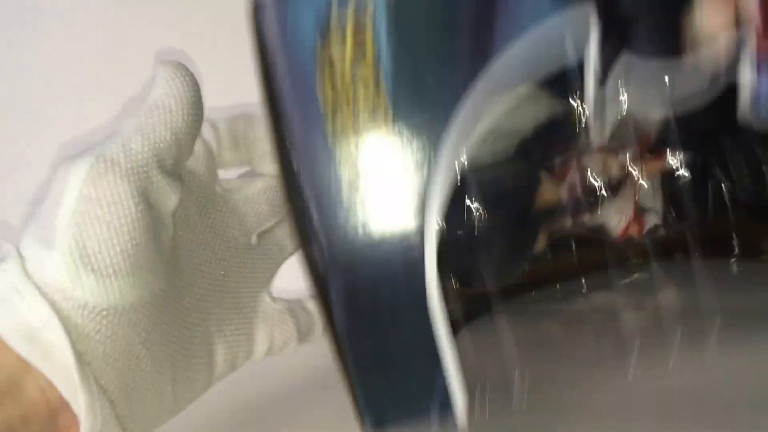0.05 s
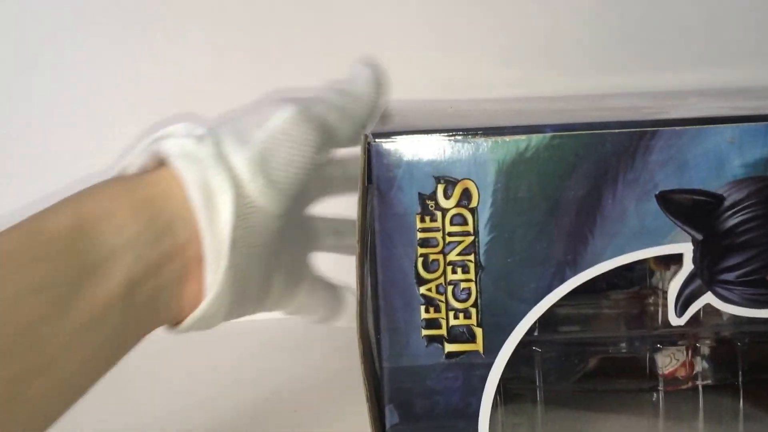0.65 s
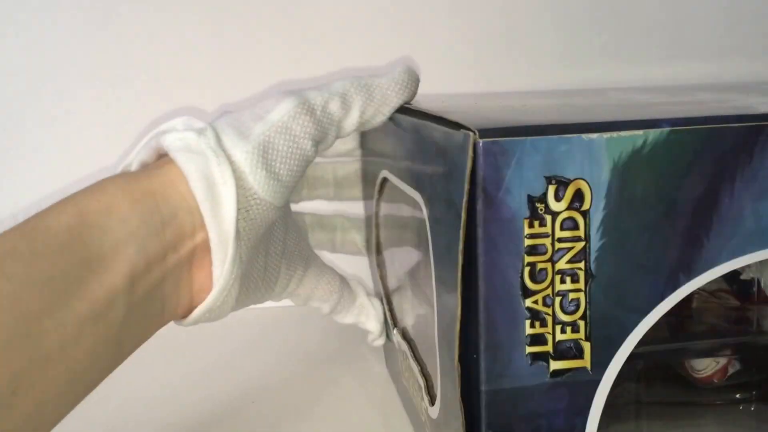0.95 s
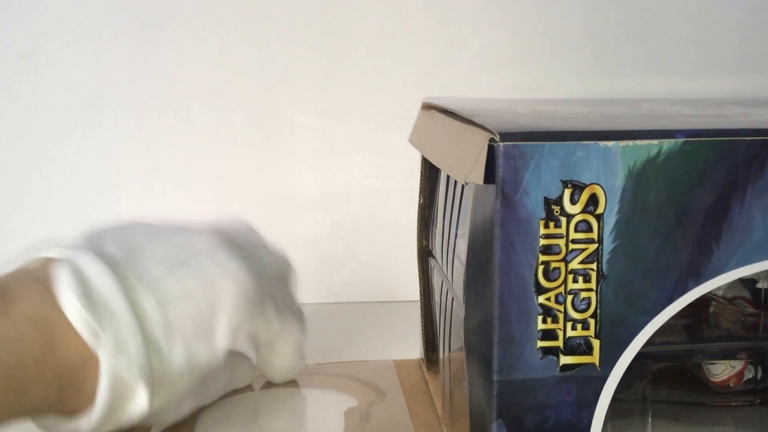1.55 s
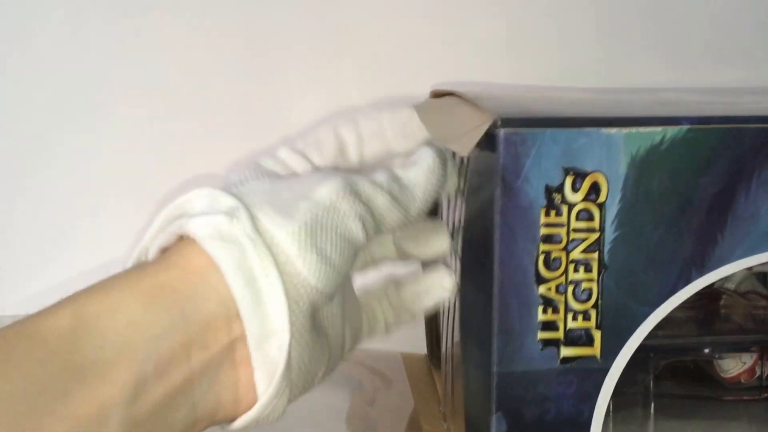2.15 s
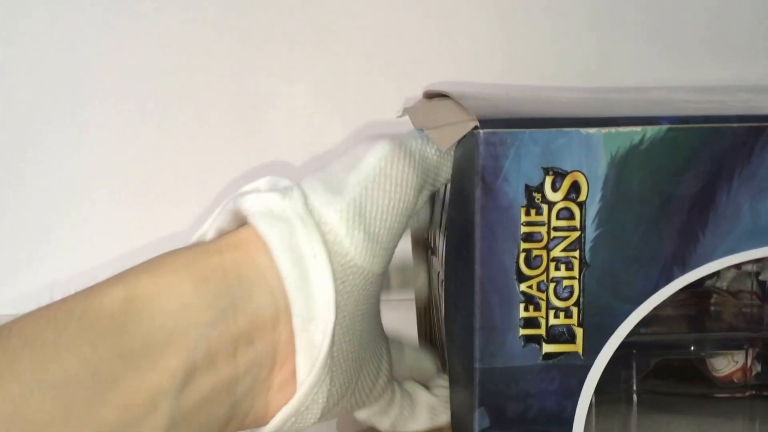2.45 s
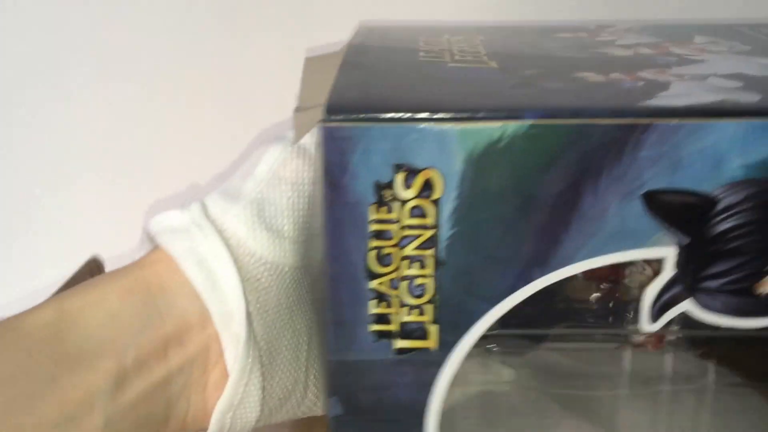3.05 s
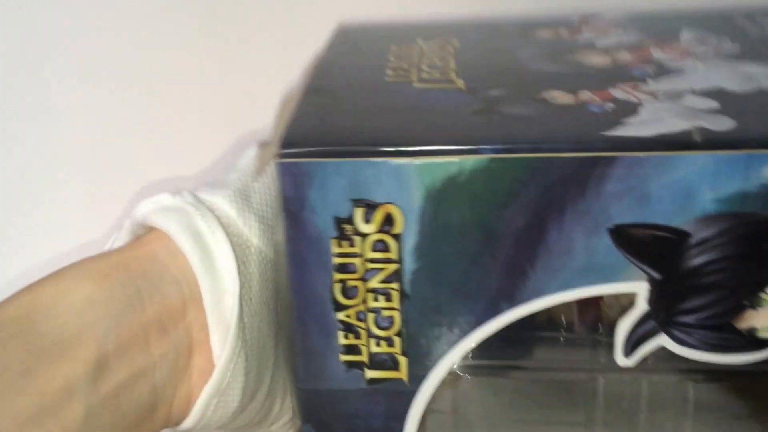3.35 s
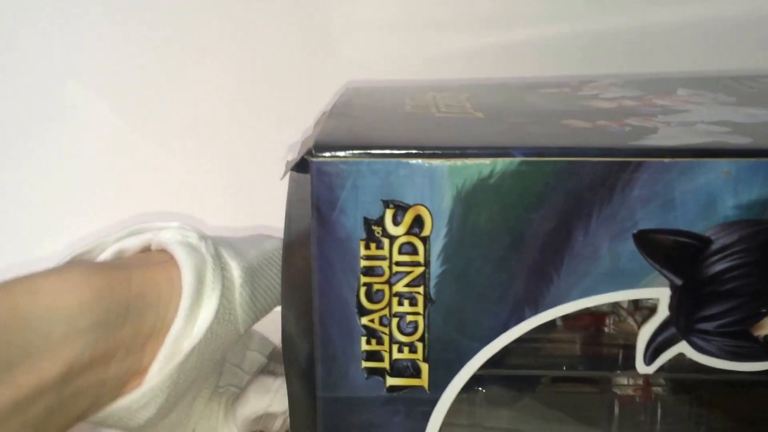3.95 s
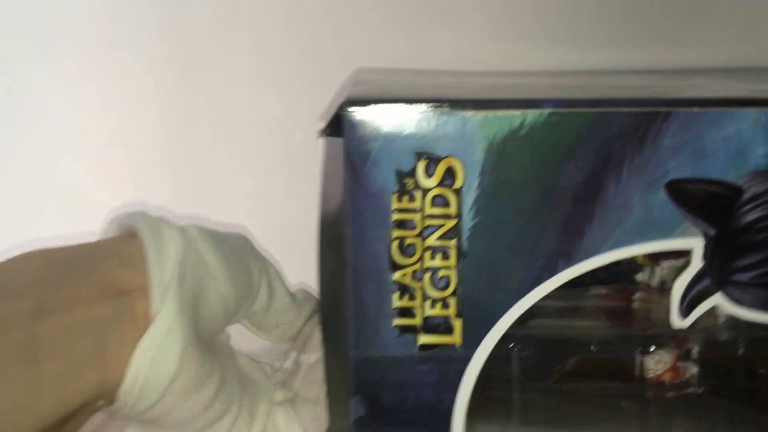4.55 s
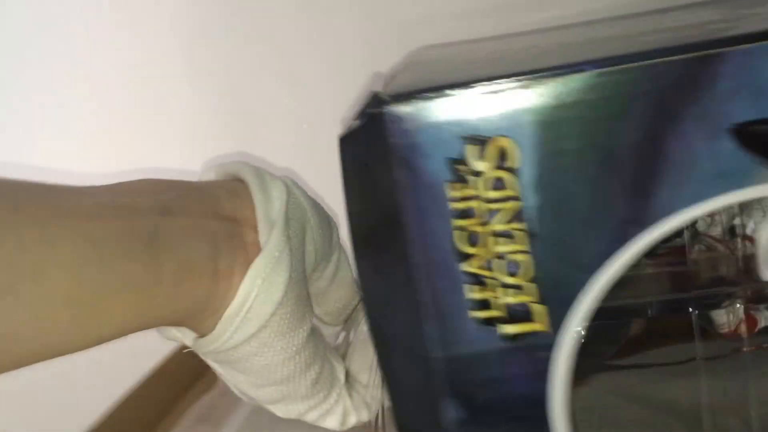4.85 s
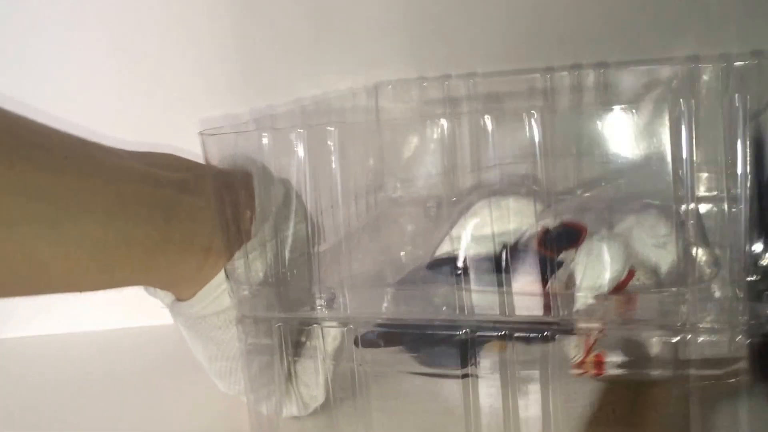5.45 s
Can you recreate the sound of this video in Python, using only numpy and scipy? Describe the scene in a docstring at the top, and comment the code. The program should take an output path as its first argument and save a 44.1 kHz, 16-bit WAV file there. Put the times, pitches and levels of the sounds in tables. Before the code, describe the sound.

Gloved hands knock and open a cardboard box and tug out a stiff plastic tray, which crackles and scrapes hollowly, close up.

```python
"""A knitted glove hisses and zips over a glossy cardboard box, which knocks down on a table.
The flap is opened, then from 2.8 s a plastic tray is tugged and dragged out along the card.
Rubbing is a stream of tiny slips that shake box and tray. The stiff plastic buckles in sharp snaps
and small ticks, the walls drum, and the emptying box sounds hollow. Close up, in a small quiet room."""
import sys
import numpy as np
from scipy import signal
from scipy.fft import rfft, irfft, next_fast_len
from scipy.io import wavfile
from scipy.ndimage import uniform_filter1d

SR = 44100
rng = np.random.default_rng(int(sys.argv[2]) if len(sys.argv) > 2 else 0)


def persist_wave(psi):
    """Save psi, clipped to +-1, as 16-bit WAV."""
    counts = np.round(np.clip(psi, -1, 1) * 32767).astype(np.int16)
    wavfile.write(sys.argv[1], SR, np.atleast_2d(counts).T)


N = 242991
TIME = np.arange(N) / SR
AGE = TIME[:SR // 3]   # seconds since a blow
CUTOFF_HZ = 15450
GRIP_S = 2.8   # the hand passes from box to tray

# glove strokes: peak/s, rise/s, fall/s, scrape/dB, hiss/dB re scrape, sizzle/dB re hiss
GLOVE_STROKES = [(.04, 0.18, 0.13, -50, 6, -2.5), (.21, 0.077, 0.054, -52, 0, 2),
                 (.3, .1, 0.33, -53, -7, -17), (.78, .015, .05, -50.5, -6, -17),
                 (.91, 0.14, 0.1, -51.5, -1.5, -9), (1.135, 0.13, 0.084, -46, 4, -2),
                 (1.22, 0.028, .03, -45, 6, -15), (1.27, 0.095, 0.1, -52.5, 2, -2),
                 (1.76, 0.068, 0.062, -51.5, 4.5, 2.5), (1.83, 0.026, 0.1, -49.5, -2.5, 2),
                 (1.93, 0.055, 0.056, -47.5, 0, 5), (2.07, 0.13, .08, -56, -1.5, -13),
                 (2.45, 0.048, 0.064, -58, 7, 2), (2.5, 0.024, 0.052, -45.5, -10, -1),
                 (2.585, 0.067, 0.033, -39.5, 0.5, -23), (2.69, 0.09, 0.12, -50.5, 6.5, -4.5),
                 (2.745, 0.042, 0.019, -40, -6.5, -9), (3.385, 0.043, 0.073, -49, 0, -2.5)]
# tugs on the tray: peak/s, rise/s, fall/s, scrape/dB, hiss/dB re scrape, hollow voice/dB re scrape
TRAY_STROKES = [(2.82, 0.043, 0.12, -46.5, -9, -16), (3.02, 0.079, 0.044, -41, -5, -12),
                (3.23, .03, 0.035, -41.5, -4.5, -14), (3.39, 0.11, 0.15, -46, -8.5, -16),
                (3.73, 0.042, 0.23, -47.5, -34, 0), (4.14, 0.14, 0.07, -43, -11, -5),
                (4.3, 0.13, .1, -47.5, -11, -1), (4.58, 0.21, 0.19, -52.5, -5, 3),
                (4.785, 0.028, 0.049, -42.5, -3, 4.5), (4.85, 0.13, 0.08, -44, -22, 6),
                (4.945, 0.028, 0.089, -45, -10, -2), (5.015, 0.09, 0.091, -34, 0.5, 2.5),
                (5.14, 0.28, .22, -43, -0.5, 6), (5.335, .13, 0.12, -31, -4, 1),
                (5.495, 0.16, .2, -32.5, 0, 3.5)]
# tone of cracking plastic: f/Hz, level/dB
CRACK_EQ = [(2800, 4.5), (4500, 3), (7000, 0.5), (10000, -3.5), (15500, 1)]


def from_db(db):
    """Decibels to gain."""
    return 10 ** (np.asarray(db) / 20)


def rms_one(x):
    """Scale to unit power."""
    return x / np.sqrt(np.mean(x ** 2) + 1e-20)


def add(out, s, sound):
    """Mix a sound in at time s."""
    at = max(round(s * SR), 0)
    out[at:at + len(sound)] += sound[:N - at]


def drift(rate_hz):
    """Smooth random wandering with spread 1."""
    r = np.exp(-40 * np.pi * rate_hz / SR)
    slow = signal.lfilter([1], [1, -2 * r, r * r], rng.standard_normal(N // 20 + 2002))[2000:]
    return np.interp(np.arange(N) / 20, np.arange(len(slow)), rms_one(slow))


def band(x, low_hz, high_hz):
    """Causal band-pass."""
    return signal.sosfilt(signal.butter(2, [low_hz, high_hz], "band", fs=SR, output="sos"), x)


def resonate(x, hz, width_hz):
    """One resonance with gain 1 at its top."""
    r = np.exp(-np.pi * width_hz / SR)
    poles = [1, -2 * r * np.cos(2 * np.pi * hz / SR), r * r]
    return signal.lfilter(np.array([1, 0, -1]) * (1 - r * r) / 2, poles, x + 1e-18)


def colour(x, eq):
    """Minimum-phase EQ, so nothing rings ahead of an attack."""
    size = 2 * next_fast_len(len(x) // 2 + 1024)
    hz, db = np.transpose(eq)
    bin_hz = np.arange(size // 2 + 1) * SR / size
    cepstrum = irfft(np.log(from_db(np.interp(np.log(bin_hz + 1), np.log(hz), db))))
    cepstrum[1:size // 2] *= 2
    cepstrum[size // 2 + 1:] = 0
    return irfft(rfft(x, size) * np.exp(rfft(cepstrum)))[:len(x)]


def package(force, tuning=1):
    """A force plus the ringing of box and tray; the grip shifts their tuning."""
    # resonances of the box, its air and the tray: f/Hz, width/Hz, level/dB
    modes = [(71.6, 32, 6.5), (136.5, 32, 10.5), (188, 41, 9.5), (253, 26, 7), (333, 53, 3.5), (364, 96, 7),
             (444, 9.7, 9), (503, 100, -3), (674, 31, -4), (950, 140, 5.5), (1092, 18, 4), (1310, 180, -2),
             (1650, 240, -8), (2150, 82, -23)]
    return force + sum(from_db(db) * resonate(force, hz * tuning, width) for hz, width, db in modes)


def plastic(force):
    """A force plus the bright ringing of the sheet."""
    # rings of the thin plastic: f/Hz, width/Hz, level/dB
    modes = [(2810, 33, -31), (3470, 69, 0.5), (4030, 190, -9.5), (4450, 79, -20), (4900, 83, -11.5),
             (5530, 200, -10), (6100, 120, -6), (6920, 47, -1), (8060, 200, -23)]
    return force + sum(from_db(db) * resonate(force, hz, width) for hz, width, db in modes)


def grains(per_s, spread_db):
    """Random micro-slips, most of them tiny and a few large."""
    sizes = from_db(spread_db * np.minimum(rng.exponential(1, N), 4)) * rng.choice([-1, 1], N)
    return sizes * (rng.random(N) < per_s / SR)


def swell(peak_s, rise_s, fall_s):
    """A hand movement speeds up and slows down smoothly."""
    off_peak = np.maximum((peak_s - TIME) / rise_s, (TIME - peak_s) / fall_s)
    return np.cos(np.pi / 2 * np.clip(off_peak, 0, 1)) ** 2


def effort(strokes, level_db):
    """Joint envelope of strokes; level_db picks each one's level from its last three columns."""
    return np.sqrt(sum((from_db(level_db(*row[3:])) * swell(*row[:3])) ** 2 for row in strokes))


def friction(strokes, rest, shake_db, shake_follows):
    """Rumble, scrape and hiss envelopes: strokes over a steady contact; more scrape, more shake."""
    from_s, to_s, rest_scrape_db, rest_hiss_db = rest
    touching = uniform_filter1d(1. * (TIME >= from_s) * (TIME <= to_s), size=SR // 50)
    scrape = np.hypot(touching * from_db(rest_scrape_db), effort(strokes, lambda db, *_: db))
    hiss = np.hypot(touching * from_db(rest_hiss_db), effort(strokes, lambda db, lift, _: db + lift))
    rumble = from_db(shake_db) * (scrape / from_db(rest_scrape_db)) ** shake_follows
    return rumble, scrape, hiss


def sliding(contact, rumble_eq, scrape_eq, hiss_eq, per_s, catch_hz, catch_db=2.5):
    """Friction catches and lets go; its grains shake the box, scrape the card and hiss on top."""
    rumble_gain, scrape_gain, hiss_gain = contact
    grip = from_db(catch_db * drift(catch_hz))
    slips = grains(per_s, spread_db=2)
    rumble = rumble_gain * rms_one(package(colour(slips, rumble_eq)))
    scrape = scrape_gain * rms_one(package(colour(slips, scrape_eq)))
    hiss = hiss_gain * rms_one(plastic(colour(slips, hiss_eq)))
    return rumble + grip * (scrape + hiss)


def room_tone(level_db=-51):
    """A steady, low bed of noise."""
    # tone of the quiet room: f/Hz, level/dB
    room_eq = [(20, -41), (43, -8.5), (90, -8), (140, 3.5), (250, -11.5), (400, -22.5), (600, -16),
               (1700, -39), (3000, -26.5), (7500, -42), (16000, -80)]
    return from_db(level_db) * rms_one(colour(rng.standard_normal(N), room_eq))


def glove_rub(contact):
    """The knit slides over the box in dense, fine slips."""
    # tones of the glove on card: f/Hz, level/dB
    rumble_eq = [(40, -31), (70, -5.5), (130, 4.5), (200, 1), (300, 2), (450, -2.5), (600, -47),
                 (900, -37.5)]
    scrape_eq = [(350, -20), (550, 10), (950, 5), (1400, 5.5), (2000, 5), (2800, -3), (4200, -49)]
    hiss_eq = [(1800, -18), (2900, -2.5), (4800, 1.5), (7500, -1.5), (11000, -3), (13500, -8.5),
               (16000, -3)]
    return sliding(contact, rumble_eq, scrape_eq, hiss_eq, per_s=12000, catch_hz=29)


def glove_zips(octave_db=-6, trim_db=-2):
    """The knit's ribs pluck an edge at a rate set by hand speed, a little different for each finger."""
    # passes over an edge: peak/s, rise/s, fall/s, rib rate/Hz, glide/(octaves per s), level/dB
    zips = [(0.029, 0.15, 0.046, 4700, -.2, -37), (0.201, .04, 0.048, 9300, 12, -41.5),
            (1.081, 0.064, 0.052, 4100, 8, -51), (1.307, .04, 0.056, 4400, -3.5, -48.5),
            (1.802, 0.043, 0.094, 5300, 0, -42.5), (1.92, 0.043, 0.034, 4950, -3.5, -43),
            (2.44, .028, .016, 10300, 19, -36), (2.463, 0.019, .02, 10000, -12.5, -39),
            (2.678, .03, 0.039, 4850, -2, -39.5)]
    out = np.zeros(N)
    fingers = [(.04 * drift(1200) + .018 * drift(60), from_db(4 * drift(200)) / 2) for _ in range(3)]
    for peak_s, rise_s, fall_s, peak_hz, glide, db in zips:
        level = from_db(db + trim_db) * swell(peak_s, rise_s, fall_s)
        on = (TIME >= peak_s - rise_s) & (TIME <= peak_s + fall_s)
        hz = peak_hz * 2 ** (glide * (TIME[on] - peak_s))
        for skid, pressure in fingers:
            speed = 1 + skid[on] * (1 + (hz / 7500) ** 2)   # fast strokes skid more
            phase = 2 * np.pi * np.cumsum(hz * speed) / SR
            octave = from_db(octave_db) * (2 * hz < SR / 2) * np.sin(2 * phase)
            out[on] += level[on] * pressure[on] * (np.sin(phase) + octave)
    return out


def glove_sizzle(flutter_db=3.5, flutter_hz=70):
    """Fine fibres flick over the glossy card in a very high, uneven hiss."""
    # tone of fibres on gloss: f/Hz, level/dB
    sizzle_eq = [(6000, -40), (9000, -12), (11500, 0), (13300, 2), (16000, -4.5)]
    level = effort(GLOVE_STROKES, lambda db, lift, gloss: db + lift + gloss)
    flutter = from_db(flutter_db * drift(flutter_hz))
    return level * flutter * rms_one(colour(grains(per_s=36000, spread_db=1.5), sizzle_eq))


def snap(levels_db, crack_eq, sheet_hz, rise_s, slip_s, ring_db=-20):
    """A panel gives way: slips build up to a click and run out, leaving a soft tail."""
    # thump, box air, sheet and crack: low/Hz, high/Hz, slip time factor, t60/s, tail/dB, push/dB
    registers = [(55.4, 362, 4.5, 0.42, 3, 22.5), (226, 764, 2.4, 0.5, -6.5, 14.5),
                 (607, 2790, 2.7, 0.36, -2, 13.5), (3020, 11700, 1.4, 0.39, 0.5, 15)]
    out, rise_s = 0, max(rise_s, 1e-4)
    build = np.minimum(AGE / rise_s, 1) ** 2
    after = np.maximum(AGE - rise_s, 0)
    tuning = np.exp(0.045 * rng.standard_normal())   # the grip differs at each snap
    # slips come in uneven clumps, about one a millisecond
    clumps = from_db(3.5 * np.interp(AGE, np.arange(501) / 1000, rng.standard_normal(501)))
    for k, (low, high, stretch, t60, tail_db, push_db) in enumerate(registers):
        slips, tail = rng.standard_normal((2, len(AGE)))
        slips *= clumps * np.exp(-after / (slip_s * stretch))
        tail *= from_db(ring_db + tail_db - 60 * after / t60)
        force = build * (slips + tail)
        force[round(rise_s * SR)] += from_db(push_db)   # the bass comes mostly from one push
        if k == 2:   # the buckled panel has a pitch of its own
            force = force + from_db(6) * resonate(force, sheet_hz, width_hz=280)
        ringing = plastic(colour(force, crack_eq)) if k == 3 else package(force, tuning)
        sound = band(ringing, low, high)
        out = out + from_db(levels_db[k]) * sound / np.std(sound[:SR // 50])   # level of the first 20 ms
    return out


def knocks_and_snaps(air_share=.6, air_lift_db=2.5, average_crack_db=-40.5, average_rise_s=0.000917):
    """Heavy blows move the box and its air, light ones only the sheet; sudden ones crack."""
    # blows to the package: t/s, level/dB, weight/dB re level, crack/dB re level, sheet f/Hz, slip/s
    blows = [(0.3456, -26, 6, -12.5, 950, 0.0046), (0.3628, -34.5, -3, -19, 1400, 0.0033),
             (0.394, -31, 1, -11.5, 1130, 0.0035), (0.421, -49.5, 18, -25, 1040, 0.0054),
             (1.16, -42.5, 2, -6, 950, 0.0038), (1.418, -47, 3, 3, 910, 0.0047),
             (1.435, -37, -12, -6, 1560, 0.0025), (1.649, -37, -17, -11, 1330, 0.0017),
             (1.7438, -44, -5, 2.5, 1090, 0.0015), (1.826, -56.5, 14, -10, 1000, .004),
             (1.873, -37, -14, -25, 1110, 0.0025), (1.958, -41.5, 15.5, -7.5, 1110, 0.0037),
             (1.978, -49.5, 14.5, -3, 930, 0.004), (2.229, -49, 10, -4, 1060, 0.016),
             (2.286, -45.5, -3, -3.5, 1140, 0.0023), (2.6, -43.5, 1, -4.5, 1180, 0.0031),
             (2.838, -36, -5, -16.5, 860, 0.001), (2.9476, -22, -9, -13.5, 2300, 0.0043),
             (2.9916, -31.5, -17, -6, 1420, 0.0023), (3.0994, -45, 5.5, -7, 815, 0.003),
             (3.1431, -32, -14, -26.5, 1190, 0.0023), (3.2016, -30, -16.5, -11, 1590, 0.0028),
             (3.26, -37.5, -25, -32.5, 1250, .003), (3.368, -40, -11, -8, 1140, .002),
             (3.4778, -34, -9.5, -17.5, 950, 0.0041), (3.4861, -33.5, -6.5, -11, 1070, 0.0031),
             (3.652, -25.5, -11, -23.5, 930, 0.0024), (3.6623, -26, -7, -18, 1000, 0.0049),
             (3.694, -19, -13.5, -28, 950, 0.0019), (3.7635, -29.5, -30, -21, 1600, 0.0016),
             (4.105, -30, -4.5, -3.5, 1870, 0.0051), (4.134, -36, -7, -1, 990, 0.0027),
             (4.163, -32, -2, -5.5, 1750, 0.0025), (4.2273, -41.5, 0.5, -10.5, 754, 0.0026),
             (4.327, -36, 2.5, -14, 1430, 0.0048), (4.4605, -47.5, 6.5, -5.5, 940, 0.0033),
             (4.6369, -45.5, 12, -8.5, 920, 0.0024), (4.725, -44.5, 6, -5, 1020, 0.0079),
             (4.9126, -29.5, -7, 3.5, 1420, 0.0025), (4.9555, -17.5, -15, -16.5, 930, 0.0011),
             (4.998, -31, -0.5, -2, 1010, 0.0035), (5.0105, -36, 4.5, 8, 1220, 0.0049),
             (5.0284, -35.5, 0, -19, 970, 0.0016), (5.347, -28, -23, 0, 1740, 0.0016),
             (5.406, -18.5, -10, -16, 1130, 0.0031), (5.424, -30.5, 3.5, -23, 1170, 0.0038),
             (5.471, -37, 9, -2, 764, 0.015)]
    out = np.zeros(N)
    for s, db, weight_db, crack_db, sheet_hz, slip_s in blows:
        levels_db = (db + weight_db, db + air_share * weight_db + air_lift_db, db, db + crack_db)
        # the build-up halves with every 14 dB more crack
        rise_s = average_rise_s * 2 ** ((average_crack_db - db - crack_db) / 14)
        tilt_db = 0.34 * crack_db   # per octave: a weak crack is also duller
        crack_eq = [(hz, eq_db + tilt_db * np.log2(hz / CRACK_EQ[0][0])) for hz, eq_db in CRACK_EQ]
        add(out, s, snap(levels_db, crack_eq, sheet_hz, rise_s, slip_s))
    return out


def wall_drums(rise_s=0.0015):
    """After a firm blow a wall of the box or tray swings in its lowest mode and dies away."""
    # drumming walls: t/s, level/dB, f/Hz, t60/s
    walls = [(.3462, -19.5, 150, .25), (.3475, -16.5, 478, 0.077), (1.9595, -33.5, 212, 0.29),
             (1.9598, -23.5, 478, 0.092), (2.9512, -24, 473, 0.16), (3.6972, -19.5, 323, 0.18),
             (3.6962, -20.5, 412.5, 0.26), (4.107, -33, 390, .25), (4.1652, -28.5, 174, 0.14),
             (4.226, -31, 393, .15), (4.329, -33, 368, .15), (4.9572, -29.5, 447, 0.18),
             (4.9567, -9, 870, .035)]
    out = np.zeros(N)
    for s, db, hz, t60 in walls:
        envelope = from_db(db - 60 * AGE / t60) * (1 - np.exp(-AGE / rise_s))
        add(out, s, envelope * np.sin(2 * np.pi * hz * AGE))
    return out


def crease_ticks(slip_s=0.0022, rise_s=0.0015, tail_db=-25, t60=0.25, ring_db=2, trim_db=-3):
    """A crease flips over: a tiny bright crack with a short ring."""
    # creases in the plastic: t/s, peak before trim/dB, f/Hz
    creases = [(0.3467, -18, 1600), (0.395, -34, 2000), (1.1124, -23, 3900), (1.4091, -27, 6700),
               (1.4198, -15, 12500), (1.4335, -18, 11000), (1.7443, -31, 9100), (1.85, -27.5, 1530),
               (2.4803, -29, 1910), (2.504, -26, 1650), (2.9592, -10.5, 1850), (3.2003, -21.5, 3730),
               (3.3125, -32, 3130), (3.3362, -32.5, 2180), (3.539, -36, 1770), (3.683, -25, 9000),
               (3.807, -24.5, 1530), (3.8416, -27.5, 1860), (3.916, -33, 1980), (3.962, -31.5, 2130),
               (4.022, -31, 1750), (4.068, -30, 1750), (4.0951, -15.5, 1880), (4.2724, -29, 2980),
               (4.351, -32.5, 1540), (4.5218, -31.5, 1590), (4.575, -33, 1830), (4.7929, -21.5, 3670),
               (4.8653, -27, 1900), (5.3342, -11, 1750), (5.3436, -4.5, 4800), (5.3498, -7.5, 1640),
               (5.407, -12, 11000)]
    out = np.zeros(N)
    attack = 1 - np.exp(-AGE / rise_s)
    decay = np.exp(-AGE / slip_s) + from_db(tail_db - 60 * AGE / t60)
    for s, peak_db, hz in creases:
        force = rng.standard_normal(len(AGE)) * attack * decay
        ring = from_db(ring_db) * resonate(force, hz, width_hz=1300)
        sound = band(colour(force, CRACK_EQ) + 0.03 * force + ring, 1100, CUTOFF_HZ)
        add(out, s, from_db(peak_db + trim_db) * sound / np.abs(sound).max())
    return out


def tray_scrape(contact):
    """The tray slides along the card in coarser slips that catch quickly."""
    # tones of plastic on card: f/Hz, level/dB
    rumble_eq = [(40, -48), (70, -3), (130, -1), (180, -2), (260, -1.5), (350, 1), (450, 2.5), (600, -30),
                 (900, -37)]
    scrape_eq = [(350, -46), (550, 7), (950, 5), (1400, 0), (2000, 1.5), (2800, -5), (4200, -18)]
    hiss_eq = [(1800, 8), (2900, 8), (4800, 4), (7000, 0), (10000, -0.5), (13500, 1), (16000, -40)]
    return sliding(contact, rumble_eq, scrape_eq, hiss_eq, per_s=3500, catch_hz=56)


def hollow_drag():
    """The rim grates over the card and the emptying box gives it a hollow voice."""
    # resonances of the half-empty box: f/Hz, width/Hz, level/dB
    modes = [(497, 150, -1), (734, 220, -0.5), (930, 150, -2.5), (1140, 120, -3)]
    rub = grains(per_s=1900, spread_db=6.5)
    hollow = sum((-1) ** k * from_db(db) * resonate(rub, hz, width)
                 for k, (hz, width, db) in enumerate(modes))
    return effort(TRAY_STROKES, lambda db, _, voice: db + voice) * rms_one(band(hollow, 360, 2400))


def tray_crackle(hiss_gain, relative_db=-5, slip_s=0.0005):
    """While the tray moves, stray creases pop, as strongly as it is rubbed."""
    burst = rng.standard_normal(len(AGE)) * np.exp(-AGE / slip_s)
    pops = signal.fftconvolve(grains(per_s=90, spread_db=2.5), burst)[:N]
    cracks = band(colour(pops, CRACK_EQ), 1600, CUTOFF_HZ)
    return hiss_gain * from_db(relative_db) * rms_one(plastic(cracks))


def room(x, wet_db=-18, t60=0.38, first_echo_s=0.00235):
    """Table and near walls return a short, dull wash."""
    decay = from_db(-60 * AGE / t60) * (AGE > first_echo_s)
    echoes = band(rng.standard_normal(len(AGE)), 86, 6000) * decay
    return x + from_db(wet_db) * signal.fftconvolve(x, echoes / np.linalg.norm(echoes))[:N]


def scene():
    """Glove, box and tray in the room, over its steady tone."""
    # steady contact between strokes: from/s, to/s, scrape/dB, hiss/dB
    glove_rest = (0, GRIP_S, -58.5, -67.5)
    tray_rest = (GRIP_S, 6.9, -52.5, -62)
    on_box = friction(GLOVE_STROKES, glove_rest, shake_db=-49, shake_follows=0.63)
    on_tray = friction(TRAY_STROKES, tray_rest, shake_db=-46, shake_follows=0.49)
    rubbing = glove_rub(on_box) + tray_scrape(on_tray)
    background = room_tone()
    hits = knocks_and_snaps() + wall_drums() + crease_ticks()
    textures = hollow_drag() + tray_crackle(hiss_gain=on_tray[2]) + glove_zips() + glove_sizzle()
    return (room(rubbing + hits + textures) + background)[None]


def record(dry):
    """A steep low-pass cuts the very top."""
    return signal.sosfilt(signal.ellip(12, .2, 80, CUTOFF_HZ, fs=SR, output="sos"), dry)


dry = scene()
out = record(dry)
persist_wave(out)
```